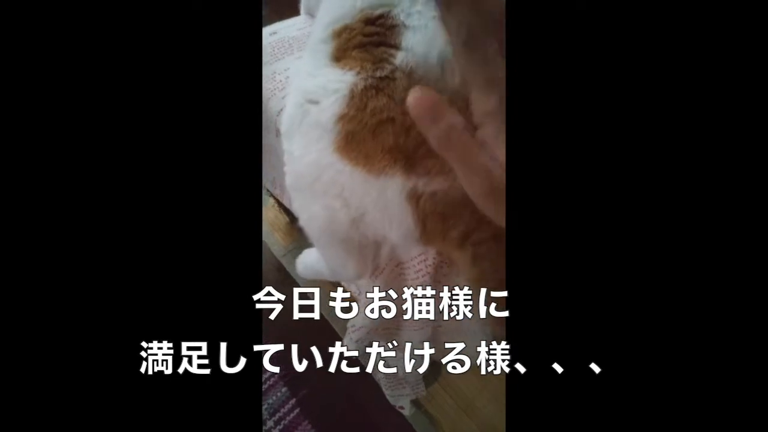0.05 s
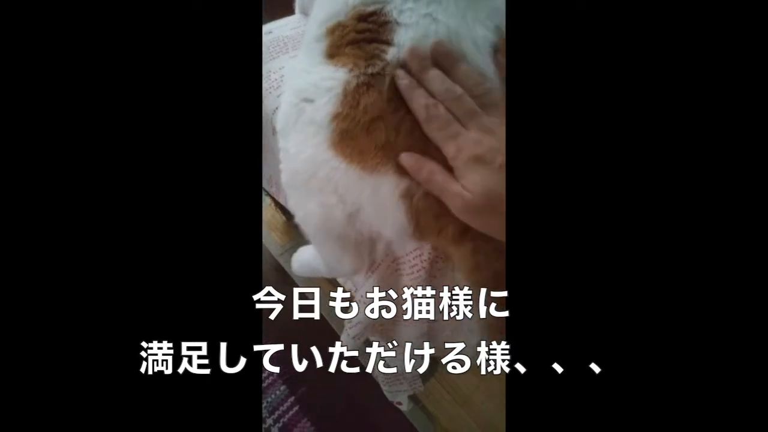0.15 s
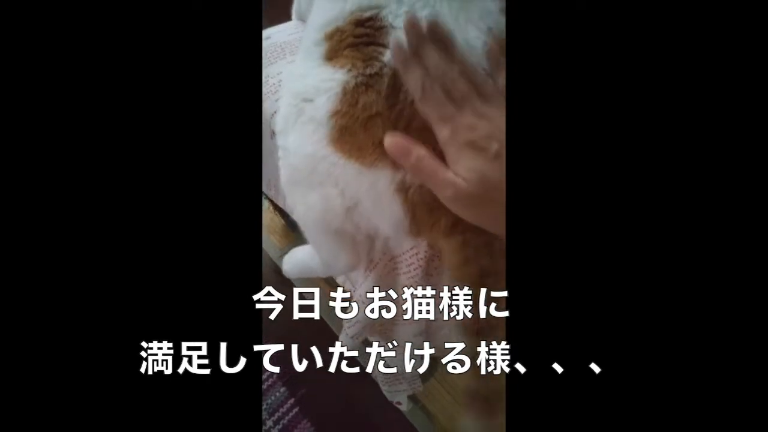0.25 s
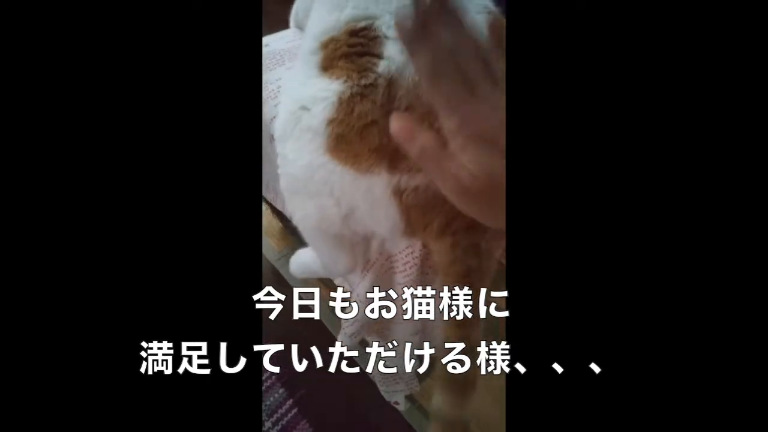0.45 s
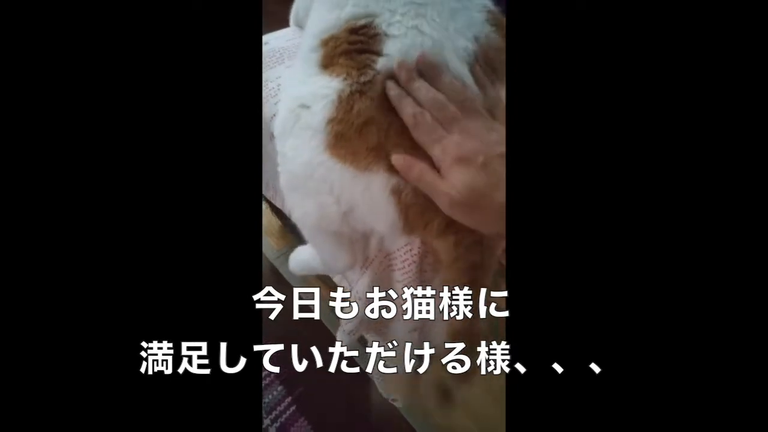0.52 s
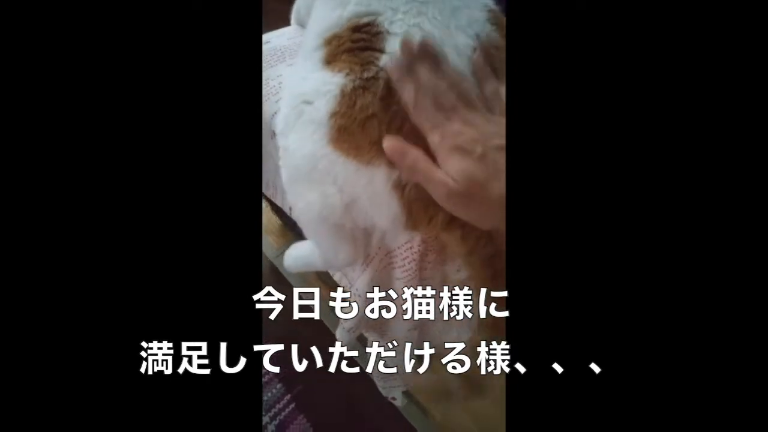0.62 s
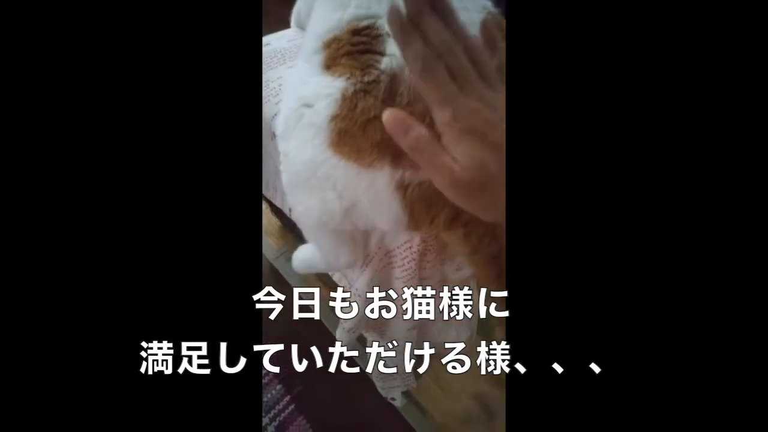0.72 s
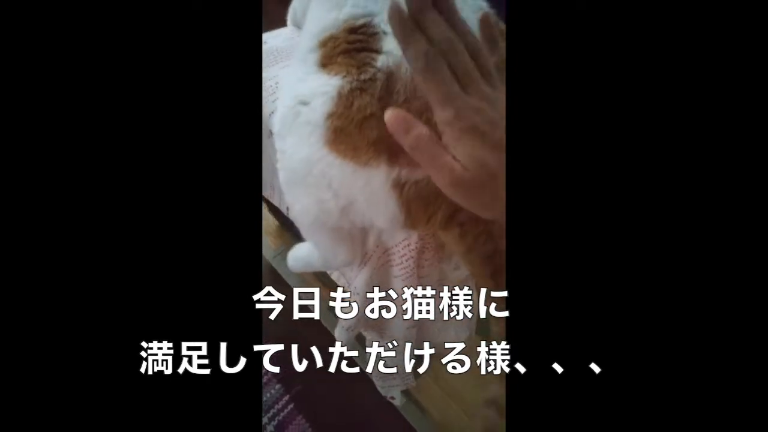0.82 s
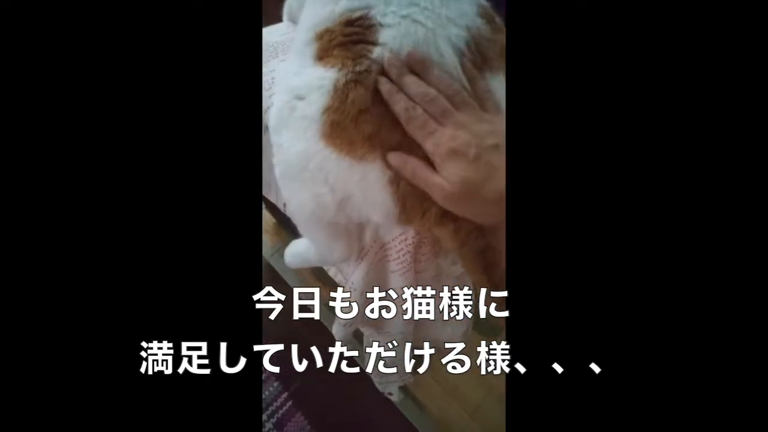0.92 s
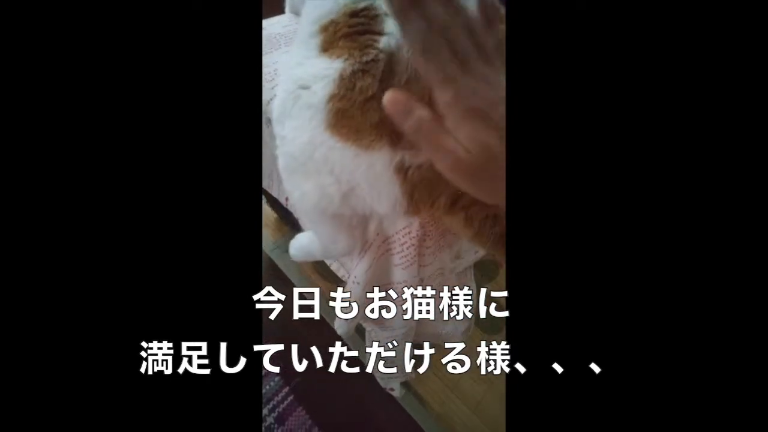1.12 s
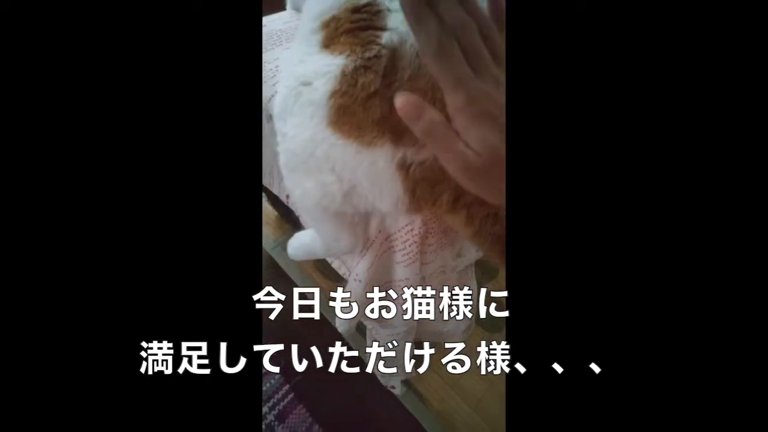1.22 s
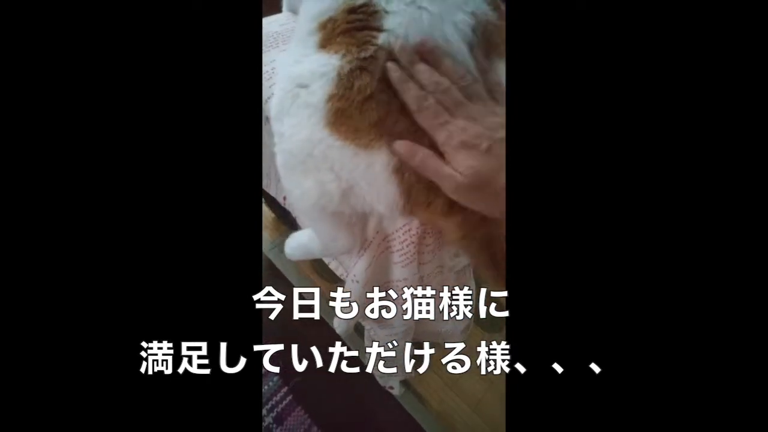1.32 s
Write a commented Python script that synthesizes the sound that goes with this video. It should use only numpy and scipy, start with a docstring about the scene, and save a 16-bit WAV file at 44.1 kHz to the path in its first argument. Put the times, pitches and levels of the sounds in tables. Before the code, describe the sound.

A hand pats a cat's furry side close by, making dull, hollow thumps. Two firm pats land at about 0.25 and 0.6 seconds, each just after a small dry click. Two much lighter pats follow at about 0.7 and 1 second, the last with a fainter click. The room is quiet, with almost no echo and a steady low rumble, faint hiss and very faint appliance whine.

```python
"""Dull, hollow thumps, close by in a quiet room: a hand pats a cat's furry flank, twice firmly, twice
lightly. Each palm stroke squeezes air from the fur, then rings the chest and flank briefly.
A small dry click, perhaps of wrist or finger, leads three strokes: a slip and a snap ring damped modes.
Behind them lie low room rumble, faint hiss and a faint appliance whine."""
import sys
import numpy as np
from scipy import signal
from scipy.fft import rfft, irfft
from scipy.io import wavfile

SR = 44100
rng = np.random.default_rng(int(sys.argv[2]) if len(sys.argv) > 2 else 0)


def digitize_waveform(pressure):
    """Quantize a signal to 16-bit integers and store it at the path in sys.argv[1].

    Rows of a 2-D input are taken as channels; values are limited to [-1, 1].
    """
    field = np.atleast_2d(pressure).T
    bounded = np.clip(field, -1, 1)
    quanta = np.round(bounded * 32767).astype(np.int16)
    wavfile.write(sys.argv[1], SR, quanta)


N = 59535
TIME_S = np.arange(N) / SR

# Palm strokes. Each row: time in seconds, level in dB, contact softness in ms, gain to the chest in dB.
PALM_STROKES = [(0.2499, -19.5, 0.62, -2), (0.621, -20, 1.093, 1.5), (0.7256, -36, 1.33, -5),
                (0.9874, -34.5, 0.81, -9.5)]
# The cat's body modes, chest then flank. Each row: frequency in Hz, level in dB, T60 in seconds.
BODY_MODES = [(217.7, 2, 0.082), (285, 1.5, 0.019)]
# Hand clicks. Each row: snap time in seconds, level in dB, pitch in Hz, slip level in dB re the snap,
# slip lead in ms.
HAND_CLICKS = [(0.2155, -17.5, 2610, -11, 1.44), (0.5929, -18.5, 2450, -42, 1.7),
               (0.986, -30, 2760, -1.5, 1.29)]
# Modes of a click. Each row: ratio to its pitch, level in dB, T60 in seconds.
HAND_MODES = [(0.811, -23, 0.014), (0.998, -0.5, 0.008), (1.2, -11.5, 0.0065), (1.95, -20.5, 0.012)]
# Spectrum of the room noise. Each row: frequency in Hz, relative density in dB.
ROOM_SPECTRUM = [(24, -42), (38, -20.5), (65, 1), (130, -1.5), (240, -2), (295, -3), (420, -8.5),
                 (560, -8.5), (750, -13), (1500, -17.5), (2800, -21), (4000, -27), (7500, -35),
                 (14000, -34)]
# Appliance tones. Each row: frequency in Hz, RMS level in dB.
WHINE_TONES = [(527.6, -76.5), (1540, -78.5), (1696.5, -80), (3843.5, -87), (3903, -87), (4864, -89),
               (5825.6, -98)]


def pats():
    """Air puffs from the fur, then the palm presses the flank in and the body rings."""
    puff_lead_s, puff_width_ms, puff_db = 0.00283, 1.01, -7
    puff, chest_force, flank_force = np.zeros((3, N))
    for at_s, db, soft_ms, chest_db in PALM_STROKES:
        contact = impact(at_s, soft_ms)
        chest_force += from_db(db + chest_db) * contact
        flank_force += from_db(db) * contact
        puff += from_db(db + puff_db) * pulse(at_s - puff_lead_s, puff_width_ms)
    body = np.zeros(N)
    for force, (hz, db, t60_s) in zip((chest_force, flank_force), BODY_MODES):
        body += from_db(db) * ring(force, hz, t60_s)
    return butterworth(puff - body, 2, 54.4, "high")  # a small body radiates little deep bass


def hand_clicks():
    """A slip and a snap ring heavily damped modes; a faint broadband crack tops each click."""
    snap_width_ms, crack_width_ms, crack_db, crack_top_hz = 0.069, 1, -37.5, 6000
    polarities = (1, 1, -1, -1)  # upper modes oppose the lower
    clicks = np.zeros(N)
    for at_s, db, pitch_hz, slip_db, lead_ms in HAND_CLICKS:
        slip = from_db(slip_db) * impact(at_s - lead_ms / 1000, snap_width_ms)
        snap = impact(at_s, snap_width_ms)
        force = from_db(db) * (slip + snap)
        for sign, (ratio, mode_db, t60_s) in zip(polarities, HAND_MODES):
            clicks += sign * from_db(mode_db) * ring(force, ratio * pitch_hz, t60_s)
        grit = butterworth(rng.standard_normal(N), 2, crack_top_hz, "low")
        clicks += from_db(db + crack_db) * pulse(at_s, crack_width_ms) * grit
    return butterworth(clicks, 1, 437, "high")  # a tiny source radiates little bass


def pulse(at_s, width_ms):
    """Gaussian of height 1; the width is its standard deviation."""
    return np.exp(-.5 * ((TIME_S - at_s) * 1000 / width_ms) ** 2)


def impact(at_s, width_ms):
    """Contact force of unit impulse; wider is duller."""
    force = pulse(at_s, width_ms)
    return force / (force.sum() + 1e-12)


def ring(force, hz, t60_s):
    """Damped mode: a unit impulse starts a decaying sine of height 1."""
    radius = from_db(-60 / (t60_s * SR))
    step_rad = 2 * np.pi * hz / SR
    feedback = [1, -2 * radius * np.cos(step_rad), radius * radius]
    return signal.lfilter([0, np.sin(step_rad)], feedback, force + 1e-18)


def butterworth(x, order, corner_hz, kind):
    """Causal low-pass or high-pass."""
    return signal.sosfilt(signal.butter(order, corner_hz, kind, fs=SR, output="sos"), x)


def from_db(db):
    """Decibels to gain."""
    return 10 ** (np.asarray(db) / 20)


def room_reverb(x, t60_s=0.084, delay_s=0.0025):
    """Reflections: a short diffuse tail of unit energy."""
    tail = rng.standard_normal(N) * from_db(-60 * TIME_S / t60_s) * (TIME_S > delay_s)
    return signal.fftconvolve(x, tail / np.linalg.norm(tail))[:N]


def room_noise(rms_db=-54):
    """Steady rumble and hiss: spectrally shaped noise."""
    hz, db = np.transpose(ROOM_SPECTRUM)
    bins_hz = np.maximum(np.fft.rfftfreq(N, 1 / SR), 1)
    shape_db = np.interp(np.log(bins_hz), np.log(hz), db)
    noise = irfft(rfft(rng.standard_normal(N)) * from_db(shape_db), N)
    return from_db(rms_db) * noise / noise.std()


def appliance_whine():
    """Thin steady sines at random phases."""
    return sum(from_db(db) * np.sqrt(2) * np.sin(2 * np.pi * (hz * TIME_S + rng.random()))
               for hz, db in WHINE_TONES)


def scene():
    """Close pats and clicks with a little reverb, over the background; mono."""
    pat_send_db, click_send_db = -30, -15.5
    thumps, clicks = pats(), hand_clicks()
    reverb = room_reverb(from_db(pat_send_db) * thumps + from_db(click_send_db) * clicks)
    return (thumps + clicks + reverb + room_noise() + appliance_whine())[None]


def record(dry):
    """The microphone drops the deepest bass; the top is cut steeply."""
    low_hz, top_hz = 35.4, 14300
    top_cut = signal.ellip(12, .1, 60, top_hz, fs=SR, output="sos")
    return signal.sosfilt(top_cut, butterworth(dry, 4, low_hz, "high"))


dry = scene()
out = record(dry)
digitize_waveform(out)
```